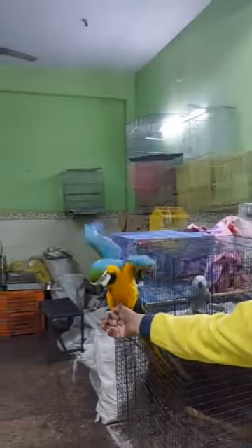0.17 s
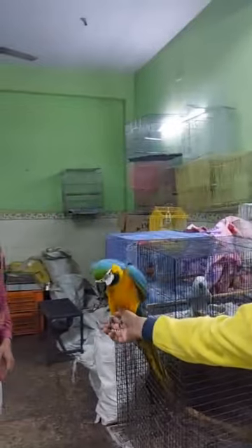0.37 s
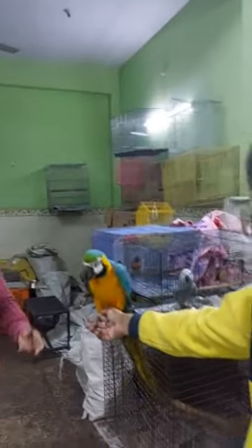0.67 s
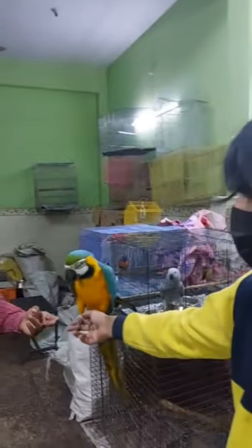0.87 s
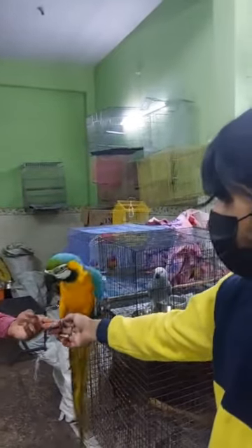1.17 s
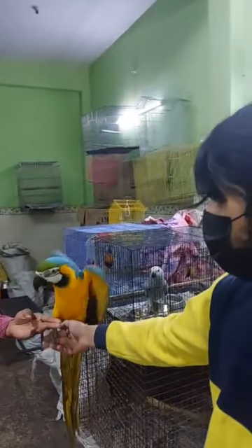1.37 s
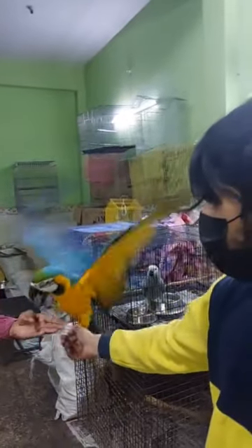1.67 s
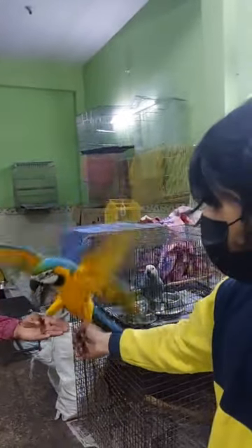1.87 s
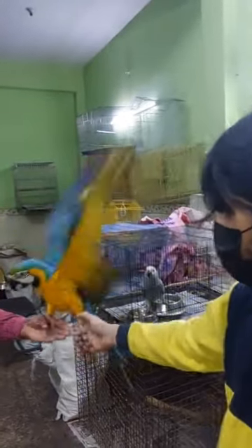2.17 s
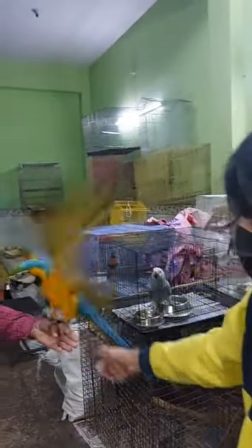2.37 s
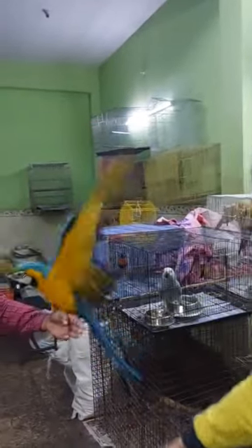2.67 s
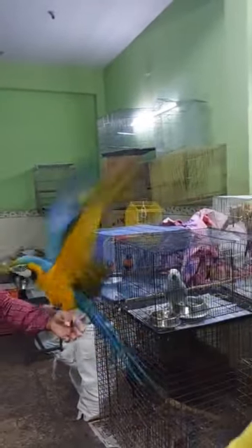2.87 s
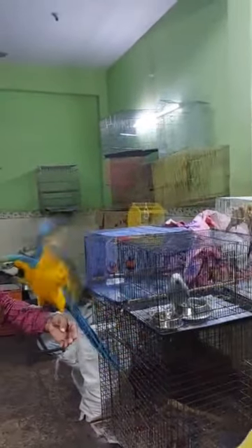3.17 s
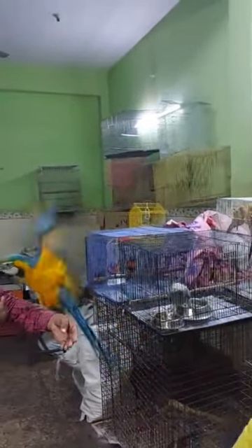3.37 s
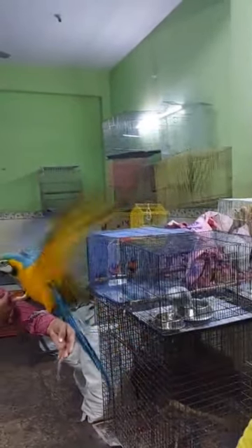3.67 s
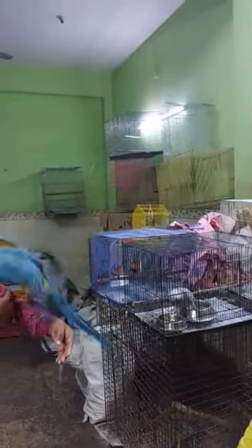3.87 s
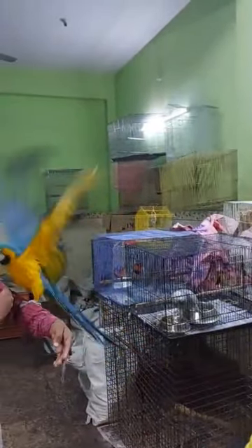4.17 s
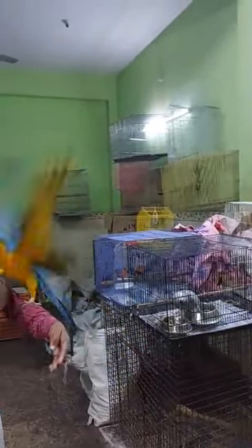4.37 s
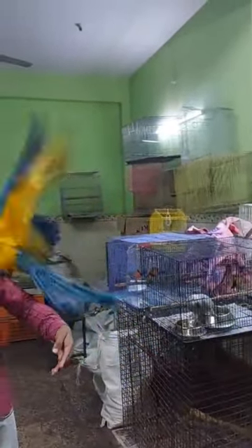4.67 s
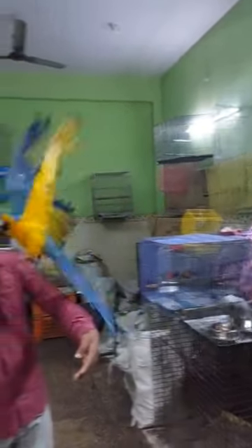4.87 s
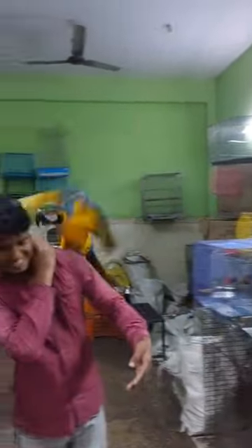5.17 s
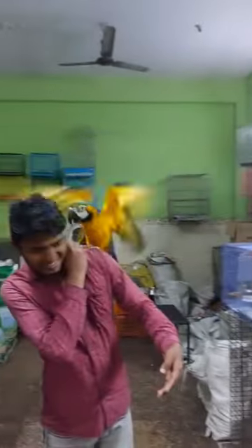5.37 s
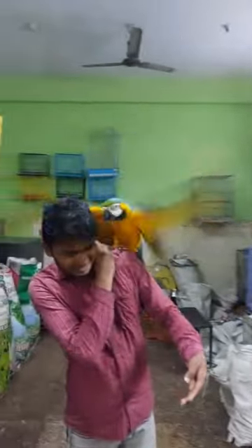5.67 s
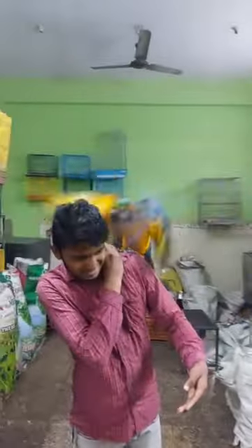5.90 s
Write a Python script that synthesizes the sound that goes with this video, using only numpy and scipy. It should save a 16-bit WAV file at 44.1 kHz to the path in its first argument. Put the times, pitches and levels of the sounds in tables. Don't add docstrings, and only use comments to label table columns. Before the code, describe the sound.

Close, harsh parrot squawks come at uneven intervals, each short, bright and smeared by bare walls. First rasping, then two piercing shrieks, then a soft waver and a distant answering bird. Mid-way, fluttering wingbeats push low puffs of air with feather rustle and cage ticks, and later more shrieks burst over them. A dull rumble fills the gaps, picked up by a small handheld microphone that overloads a little.

```python
import sys
import numpy as np
from scipy import signal
from scipy.io import wavfile
from scipy.ndimage import uniform_filter1d

SR = 44100
rng = np.random.default_rng(int(sys.argv[2]) if len(sys.argv) > 2 else 0)


def undo_db(level):
    steps = np.asarray(level, float) / 20
    return 10 ** steps


def int16_out(signal):
    q = np.round(np.clip(np.atleast_2d(signal).T, -1, 1) * 32767)
    wavfile.write(sys.argv[1], SR, q.astype(np.int16))


N = 266143
T = np.arange(N) / SR


def evened(x):
    return x / np.sqrt(np.mean(x ** 2) + 1e-20)


def read(points, hz):
    f, value = np.transpose(points)
    return np.interp(np.log(hz + 1), np.log(f + 1), value)


def gain_over_time(points):
    return undo_db(np.interp(T, *np.transpose(points)))


def add(mix, s, sound):
    part = mix[round(s * SR):][:len(sound)]
    part += sound[:len(part)]


def wobble(length, hz):
    r = np.exp(-2 * np.pi * hz / SR)
    white = rng.standard_normal(length + 999)
    return evened(signal.lfilter([1], [1, -2 * r, r * r], white)[999:])


def noise(spectrum, patchy_db):
    frames, hz = N // 256 + 5, np.fft.rfftfreq(1024, 1 / SR)
    real, imaginary, patches = rng.standard_normal((frames, 513, 3)).T
    patches = uniform_filter1d(patches, size=12, axis=0)
    patches = evened(uniform_filter1d(patches, size=10, axis=1))
    f = np.transpose(spectrum)[0]
    inside = (hz >= f[0]) & (hz <= f[-1])
    gain = undo_db(read(spectrum, hz)[:, None] + patchy_db * patches) * inside[:, None]
    z = (real + 1j * imaginary) * gain
    return evened(signal.istft(z, nperseg=1024, noverlap=768)[1][:N])


def resonate(x, hz, width):
    turn = np.exp(2j * np.pi * hz * np.arange(len(x)) / SR)
    r = np.exp(-np.pi * width / SR)
    return 2 * (turn * signal.lfilter([1 - r], [1, -r], x / turn)).real


def bursts(rows, rise_db_s, fall_db_s):
    s, db = np.transpose(rows)[:, :, None]
    slope_db = np.maximum(rise_db_s * (s - T), fall_db_s * (T - s))
    return np.sqrt((undo_db(np.maximum(db - slope_db, -200)) ** 2).sum(axis=0))


# f/Hz, level/dB
BEAK_RESPONSE = [(300, -75), (900, -26), (2000, -1), (3000, -2), (4300, -1), (5300, -3.5), (6400, -7.5),
                 (8500, -14), (10000, -19), (13000, -26), (16000, -32)]


def call(rows, gape, first_db):
    s, *columns = np.transpose(rows)
    t = np.arange(s[0], s[-1], 1 / SR)
    effort_db, hz, rough, bright_db = (np.interp(t, s, c) for c in columns)
    rough = np.clip(rough, 0, 1)
    hz = hz * (1 + .13 * rough * wobble(len(t), hz=200))
    turns, throb = np.cumsum(hz) / SR, wobble(len(t), hz=75)

    breath = rng.standard_normal(len(t)) * (0.2 + np.exp(-(turns % 1) / 0.5))
    f, _, z = signal.stft(breath, SR, nperseg=128)
    colour = read(BEAK_RESPONSE, f / gape)
    colour += bright_db.mean() * np.log2(f / 3000 + 0.099) - 5.6 * (f / 12000) ** 2
    breath = evened(signal.istft(z * undo_db(colour)[:, None], SR, nperseg=128)[1][:len(t)])

    tone = 0
    for k in np.arange(1, 33) / 2:
        half_db = 0 if k % 1 == 0 else -22 + 21 * rough
        db = read(BEAK_RESPONSE, k * hz / gape) + first_db * (k <= 1)
        db += bright_db * np.log2(k * hz / 3000) + half_db
        db += (2 + 5 * rough) * wobble(len(t), hz=35)
        tone = tone + undo_db(db) * (k * hz < 16000) * np.cos(2 * np.pi * k * turns + k * k)
    tone /= np.sqrt(uniform_filter1d(tone ** 2, size=400) + 1e-9)
    voice = np.sqrt(1 - .8 * rough ** 2) * tone + rough ** 1.6 * breath
    return s[0], undo_db(effort_db + (0.5 + 0.68 * rough) * throb) * voice


def song(rows, rough, bright_db, first_db):
    top_db = max(row[1] for row in rows)
    rows = [(s, db, hz, rough, bright_db + 0.47 * (db - top_db)) for s, db, hz in rows]
    return call(rows, 1, first_db)


def birds(calls):
    mix = np.zeros(N)
    for s, sound in calls:
        add(mix, s, sound)
    return mix


# start t/s, loudest t/s, end t/s, effort level/dB, f/Hz
RASPS = [
    (0, -0.005, 0.066, -26, 2293),
    (0.148, .32, 0.4, -23.5, 2400),
    (1.479, 1.549, 1.663, -36, 1600),
]
RASP_TILTS_DB = [2, 1.8, -9.5]
RASP_ROUGH = .47, .68, 1.


def rasps():
    edge_db, sag = -16.5, 0.14
    fresh, worn, spent = RASP_ROUGH
    calls = []
    for (start, top, end, db, hz), bright_db in zip(RASPS, RASP_TILTS_DB):
        arch = [(start, db + edge_db, hz, fresh, bright_db),
                (.6 * start + .4 * top, db - 2.5, 1.04 * hz, fresh, bright_db),
                (top, db, hz, worn, bright_db),
                (.4 * top + 0.59 * end, db - 9.5, hz * (1 - sag / 2), worn, bright_db),
                (end, db + edge_db, hz * (1 - sag), spent, bright_db)]
        calls.append(call(arch, gape=0.78, first_db=-9.5))
    return calls


# f/Hz, t60/s
WALL_DECAY = [(250, 0.22), (1000, 0.62), (2600, 0.64), (7000, 0.55), (15000, 0.39)]


def walls(x):
    taps, at = np.zeros(SR), np.arange(200, SR - 20, 20)
    taps[at + rng.integers(0, 20, len(at))] = rng.choice([-1., 1.], len(at))
    taps[[173, 311, 467, 643, 853, 1087]] = 1.4 * np.array([1, -1, 1, 1, -1, 1])
    hz, t, z = signal.stft(taps, SR, nperseg=256)
    decay = undo_db(-60 * t / read(WALL_DECAY, hz)[:, None])
    tail = signal.istft(z * decay, SR, nperseg=256)[1]
    return signal.fftconvolve(x, tail / np.linalg.norm(tail))[:N]


# t/s, level/dB
HUM_LEVEL = [(0, -52.5), (.6, -57), (1, -58.5), (1.8, -67), (2.1, -52), (2.8, -47), (3.17, -60), (3.4, -54),
             (3.85, -55.5), (4.17, -57), (4.35, -49), (5.15, -55.5), (5.55, -52), (6.03, -59)]
# f/Hz, level/dB per Hz
HUM_SPECTRUM = [(15, -70), (25, -64), (86, 1.5), (171, -10.5), (287, -9), (321, -11.5), (390, -6),
                (467, -20), (700, -15), (910, -62), (1540, -120)]


def street_hum():
    return gain_over_time(HUM_LEVEL) * noise(HUM_SPECTRUM, patchy_db=0.0)


# t/s,
# level/dB
FLUTTER = [(0, -75), (.2, -54), (.68, -83), (.72, -59), (1.3, -71.5), (1.75, -65), (2.05, -64), (2.47, -56),
           (3, -56.5), (3.2, -61), (3.29, -55.5), (3.58, -63.5), (3.82, -56.5), (4.36, -56.5),
           (4.45, -47.5), (4.62, -44.5), (4.8, -56.5), (5.35, -61), (6.03, -54.5)]


def flutter():
    return gain_over_time(FLUTTER)


# t/s, thump level/dB
STROKES = [(.242, -54), (.4, -60), (1.91, -42.5), (2.1, -41.5), (2.27, -39.5), (2.45, -36.5), (2.61, -31),
           (2.69, -45), (2.78, -38), (2.9, -37.5), (3.01, -38), (3.13, -37.5), (3.33, -56.5), (3.8, -42.5),
           (3.92, -44), (4.13, -39), (4.3, -40.5), (4.43, -41.5), (4.67, -39.5), (4.79, -38), (5.02, -38),
           (5.09, -58), (5.19, -39), (5.59, -37.5), (5.76, -37.5), (5.93, -41.5)]
# f/Hz, bandwidth/Hz, level/dB
AIR_MODES = [(134.4, 30, -3.5), (191.2, 52, 5), (234.7, 31, 0), (289.6, 140, -7)]
# f/Hz, level/dB
SWISH_SPECTRUM = [(300, 0), (450, -2), (850, -0.5), (1300, -6), (2500, -4), (5000, -59)]


def wings():
    shove = rng.standard_normal(N) * undo_db(1.8 * wobble(N, hz=28.4))
    thump = np.zeros(N)
    for hz, width, db in AIR_MODES:
        mode = resonate(resonate(shove, hz, 1.51 * width), hz, 1.51 * width)
        thump += undo_db(db) / np.sqrt(width) * mode
    swish = noise(SWISH_SPECTRUM, patchy_db=1.0) * undo_db(3.05 + 2.4 * wobble(N, hz=37))
    effort = flutter()
    beat = bursts(STROKES, rise_db_s=170, fall_db_s=127) + undo_db(-5.5) * effort
    swish_gain = undo_db(-53.5) * (effort / undo_db(-53.5)) ** 0.95
    return beat * evened(thump) + swish_gain * swish


# f/Hz, level/dB per Hz
FEATHER_SPECTRUM = [(530, -21.5), (900, -4), (1820, -1.5), (2760, -6.5), (3770, -4.5), (7010, -5),
                    (8580, -12), (12300, -5), (15600, -11)]
# t/s, level/dB
VANES = [
    (2.538, -50.5),
    (2.79, -58.5),
    (2.87, -52),
    (3.0, -55.5),
    (3.19, -54),
]
# f/Hz, level/dB
VANE_SPECTRUM = [(2500, -10), (4000, -6.5), (9000, -13), (15700, -7)]


def rustle():
    body = noise(FEATHER_SPECTRUM, patchy_db=1.8) * flutter()
    flicks = bursts(VANES, rise_db_s=917, fall_db_s=75) * undo_db(-1.5)
    vanes = noise(VANE_SPECTRUM, patchy_db=6.0) * flicks
    return (body + vanes) * undo_db(0.42 * wobble(N, hz=25.8))


# t/s, peak level/dB, centre f/Hz,
# t60/s
TICKS = [(.697, -48, 2970, 0.049), (1.551, -54, 10000, 0.34), (1.599, -53.5, 9300, 0.35),
         (1.649, -61, 10400, .3), (2.108, -47.5, 9000, 0.014), (2.113, -44.5, 10100, 0.018),
         (2.288, -53, 9600, 0.086), (2.292, -38, 5500, 0.052), (2.345, -46, 6000, 0.027),
         (2.369, -36.5, 5400, 0.035), (2.372, -47, 9400, 0.035), (2.537, -48, 6550, 0.033),
         (2.54, -43, 1820, 0.068), (2.66, -52, 8000, .015), (2.828, -46, 9050, .015),
         (2.867, -48, 7000, .015), (3.01, -50, 9000, .02), (3.299, -39, 1460, 0.068),
         (3.302, -48, 1980, 0.056), (3.646, -44, 5550, 0.014), (3.663, -50, 5900, 0.022),
         (3.671, -47, 8550, 0.016), (4.425, -41.5, 8750, 0.057), (4.43, -38, 3460, 0.033),
         (4.749, -52, 9650, 0.029)]


def ticks():
    mix, t = np.zeros(N), np.arange(2500) / SR
    for s, db, hz, t60 in TICKS:
        snap = evened(resonate(rng.standard_normal(len(t)), hz, 0.17 * hz))
        add(mix, s, undo_db(db - 60 * t / t60) * snap)
    return mix


# start t/s, upward crack t/s, end t/s, effort level/dB, held f/Hz
SHRIEKS = [
    (0.716, 0.757, .84, -16, 2125),
    (0.971, 1.001, 1.066, -13, 2172),
    (3.622, 3.646, 3.685, -39.5, 2056),
    (3.878, 3.917, 4.015, -17, 2108),
    (4.038, 4.086, 4.2, -18.5, 2060),
    (4.824, 4.851, 4.99, -23.5, 2059),
    (5.409, 5.472, 5.54, -19, 1856),
    (5.621, 5.718, 5.785, -19.5, 1852),
]
# opening f/Hz, pitch sag as a share, swell level/dB, fundamental level/dB
THROATS = [(953, 0.054, 4.5, -4), (1173, 0.0437, 6.5, -7), (1560, 0.034, 5, 12), (1314, 0.0079, 5.5, 2),
           (1400, 0.0995, 2, 2), (1317, .24, 8, 1.5), (944, 0.026, 1.5, 6), (986, 0.0086, 1.5, 2)]
HOARSE = [.15, .14, .26, .27, .22, .26, .24, .26]
BRIGHT_DB = [4.1, 2.4, 1.6, 5.2, 5.8, 6.5, 5.7, 5.9]


def shriek(start, crack, end, db, hz, first_hz, sag, swell_db, first_db, rough, bright_db):
    open_s, crack_s, close_s = .013, .008, 0.02006
    closed_db, strain_rough = -22, .22
    dull_db, low_bright_db = -15, -1.5
    low_hz = .76 * hz
    strained, cracked_db = rough + strain_rough, db - swell_db
    half_strained = rough + strain_rough / 2
    low = [(start, cracked_db - 22, first_hz, rough, dull_db),
           (start + open_s, cracked_db - 13, .4 * first_hz + .6 * low_hz, half_strained, low_bright_db),
           (crack, cracked_db - 1.5, low_hz, strained + strain_rough / 2, bright_db / 2),
           (crack + crack_s, cracked_db + closed_db, low_hz, strained, low_bright_db)]
    high = [(crack - crack_s, cracked_db + closed_db, hz * (1 + sag / 2), strained, bright_db),
            (crack, cracked_db - 3.5, hz * (1 + sag / 2), strained, bright_db),
            ((crack + end) / 2, db - 0.61 * swell_db, hz, rough, bright_db),
            (end - close_s, db, hz * (1 - sag / 2), rough, bright_db),
            (end, db + closed_db, hz * (1 - 1.02 * sag), strained, bright_db)]
    return [call(low, gape=0.9, first_db=-4.5), call(high, gape=0.96, first_db=first_db)]


def shrieks():
    calls = []
    for times, throat, rough, bright_db in zip(SHRIEKS, THROATS, HOARSE, BRIGHT_DB):
        calls += shriek(*times, *throat, rough, bright_db)
    return calls


# t/s, effort level/dB, f/Hz
WARBLE = [
    (1.24, -59, 1269),
    (1.281, -51.5, 1051),
    (1.323, -37, 966.5),
    (1.376, -38.5, 999.6),
    (1.409, -27.5, 1042),
    (1.46, -39.5, 958),
    (1.55, -41, 838),
    (1.64, -62, 828),
]


def warble():
    return song(WARBLE, rough=0.148, bright_db=3.9, first_db=17.3)


# t/s, effort level/dB, f/Hz
ARCHING = [
    (2.056, -56.5, 1598),
    (2.1, -38.5, 1895),
    (2.15, -44.5, 2548),
    (2.245, -37, 2258),
    (2.28, -41.5, 2078),
    (2.37, -46.5, 1853),
    (2.4, -70, 1840),
]
# t/s, effort level/dB, f/Hz
HELD = [
    (2.14, -38.5, 2507),
    (2.175, -36.5, 2758),
    (2.22, -39, 2800),
    (2.265, -33.5, 2740),
    (2.285, -56, 2610),
]


def far_bird():
    return [song(ARCHING, rough=0.272, bright_db=-3.1, first_db=5.6),
            song(HELD, rough=0.2, bright_db=-0.64, first_db=24.0)]


# t/s, effort level/dB, f/Hz
VOICE_DROP = [
    (4.196, -21, 1720),
    (4.23, -38, 1703),
    (4.256, -60, 1740),
]


def voice_drop():
    return song(VOICE_DROP, rough=0.097, bright_db=7.8, first_db=-2.5)


def scene():
    near = birds(rasps() + shrieks() + [warble(), voice_drop()])
    far, small = birds(far_bird()), ticks()
    echo = walls(undo_db(-2.5) * near + undo_db(1.0) * far + undo_db(-3.0) * small)
    direct = undo_db(-3.5) * near + undo_db(-0.5) * far + small
    return (direct + echo + wings() + rustle() + street_hum())[None]


def top_cut(x):
    return signal.sosfilt(signal.butter(12, 15740, fs=SR, output="sos"), x)


def record(dry):
    thud = signal.lfilter(*signal.butter(1, [50, 450], "band", fs=SR), dry ** 2)
    return top_cut(dry + 0.65 * thud)


dry = scene()
out = record(dry)
int16_out(out)
```